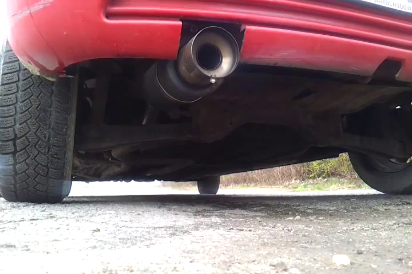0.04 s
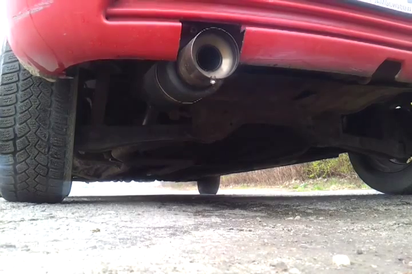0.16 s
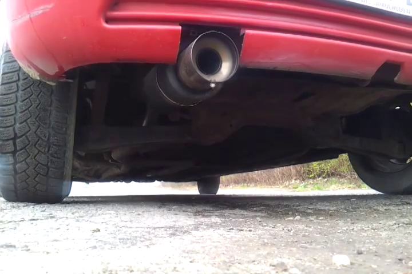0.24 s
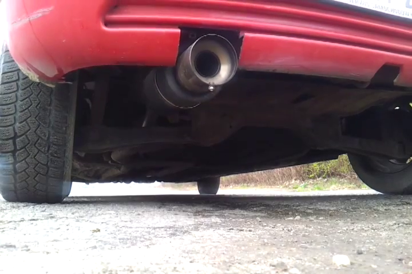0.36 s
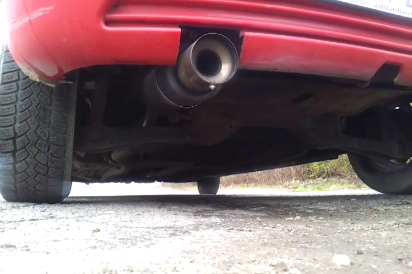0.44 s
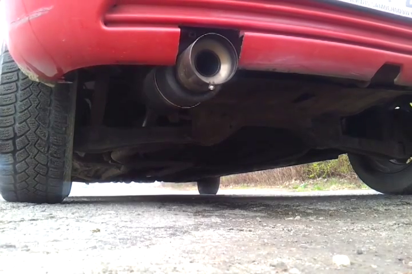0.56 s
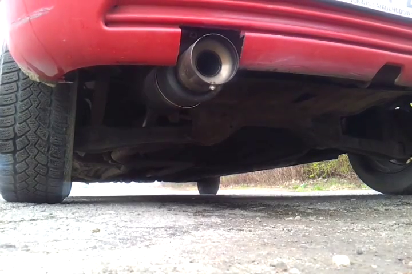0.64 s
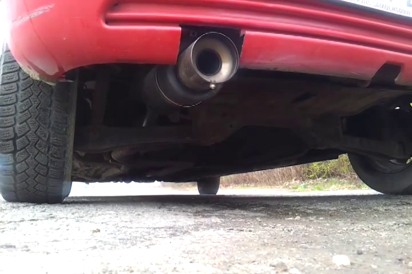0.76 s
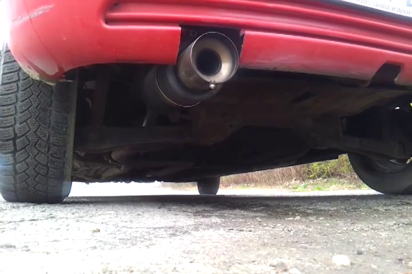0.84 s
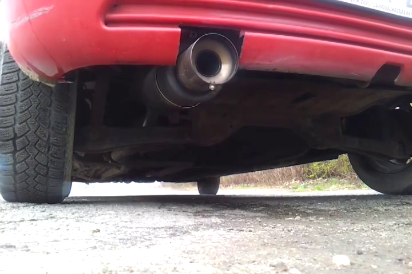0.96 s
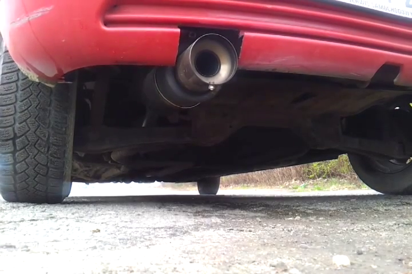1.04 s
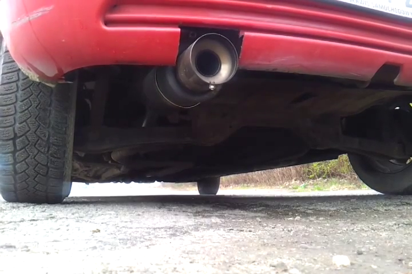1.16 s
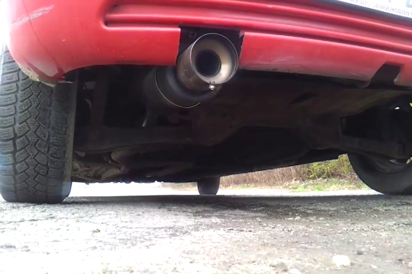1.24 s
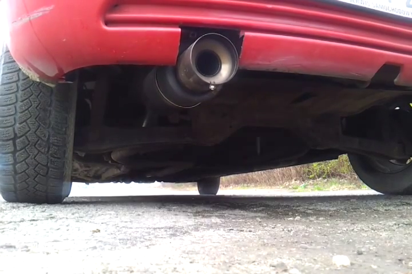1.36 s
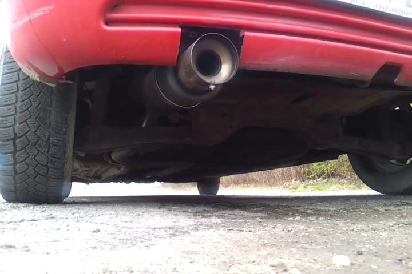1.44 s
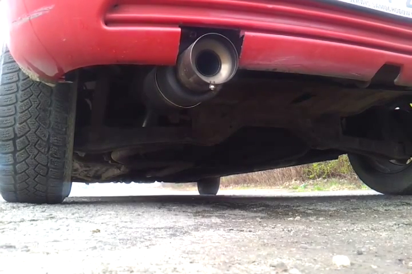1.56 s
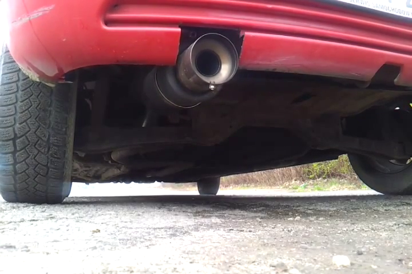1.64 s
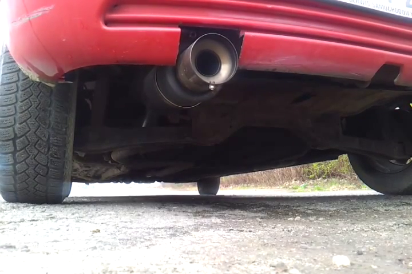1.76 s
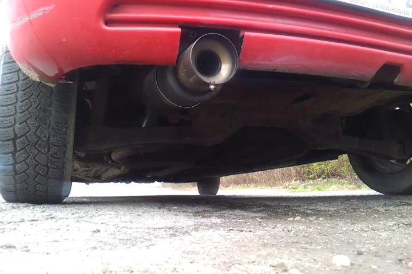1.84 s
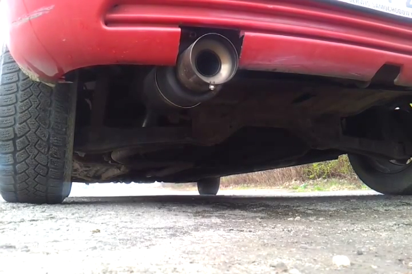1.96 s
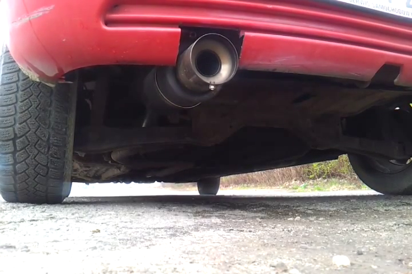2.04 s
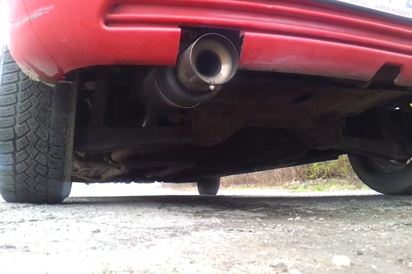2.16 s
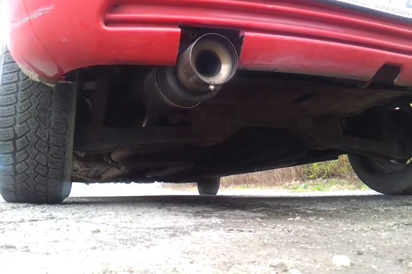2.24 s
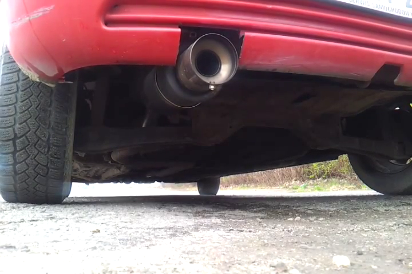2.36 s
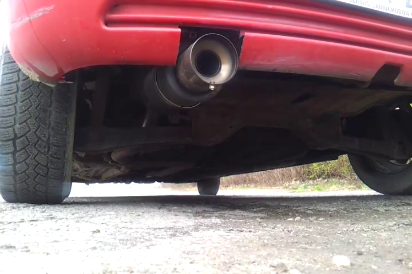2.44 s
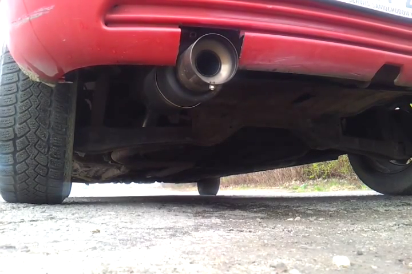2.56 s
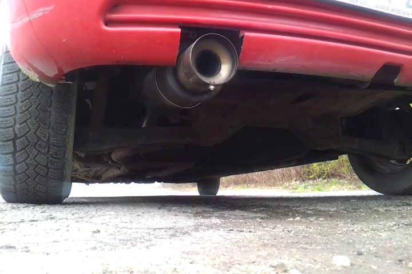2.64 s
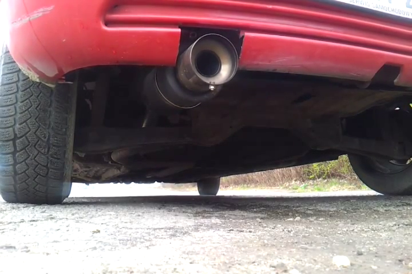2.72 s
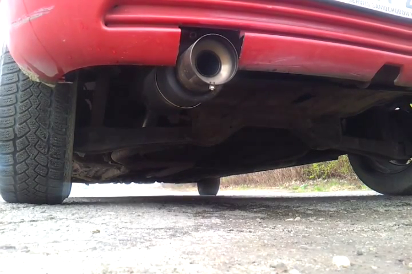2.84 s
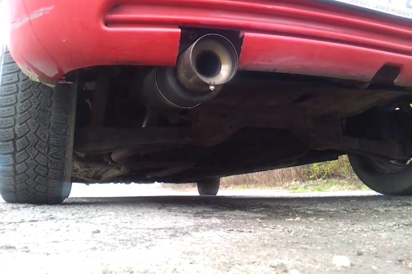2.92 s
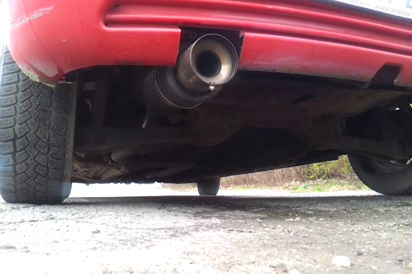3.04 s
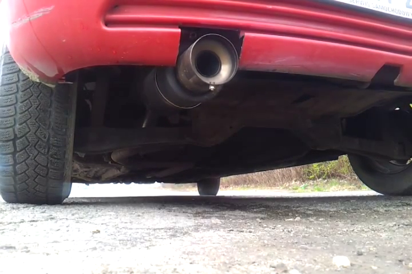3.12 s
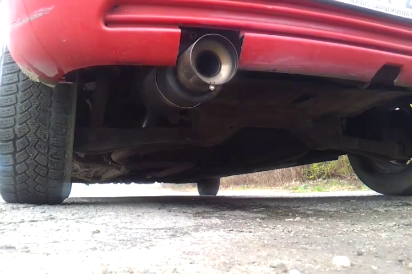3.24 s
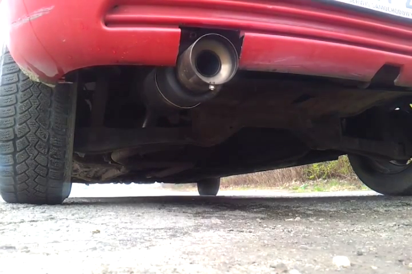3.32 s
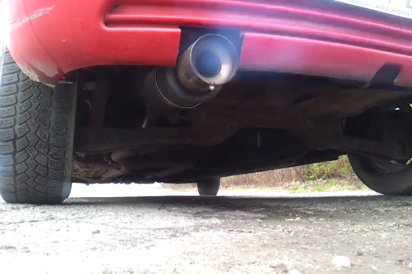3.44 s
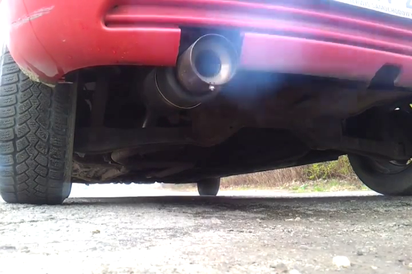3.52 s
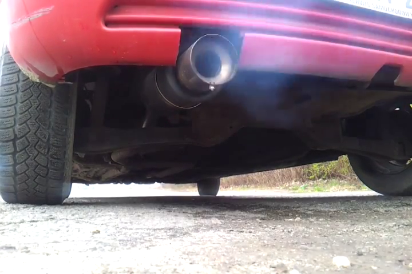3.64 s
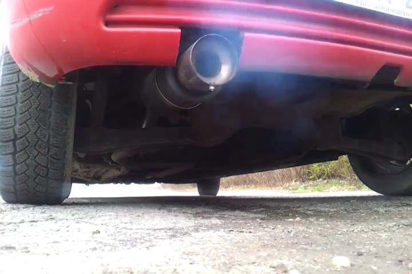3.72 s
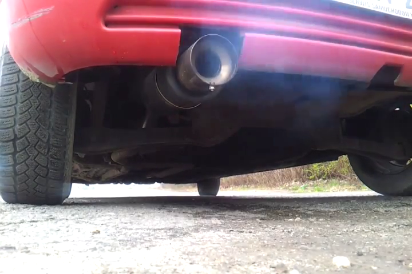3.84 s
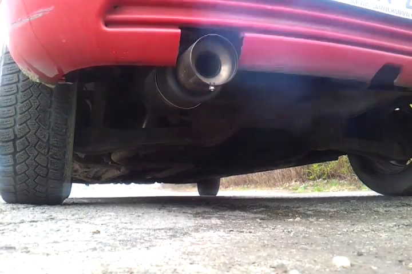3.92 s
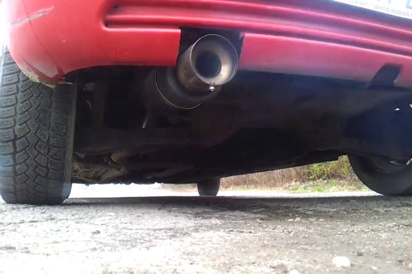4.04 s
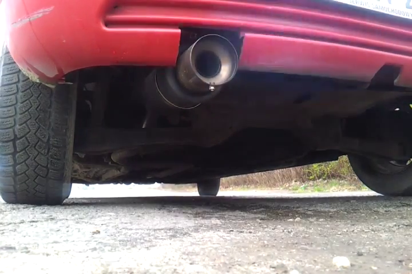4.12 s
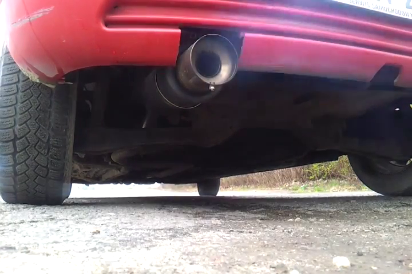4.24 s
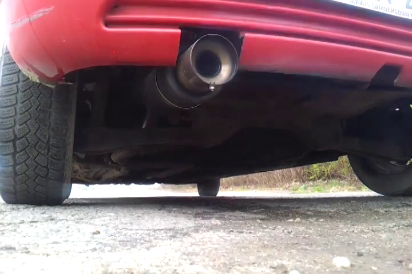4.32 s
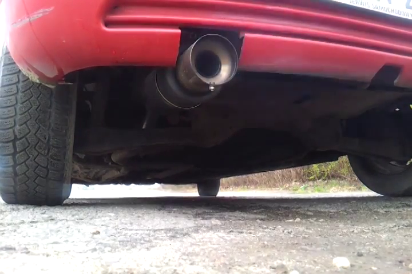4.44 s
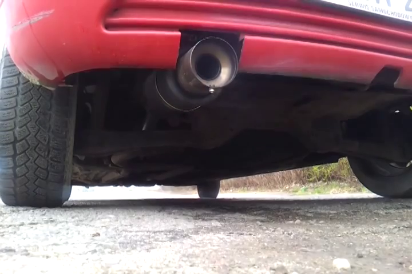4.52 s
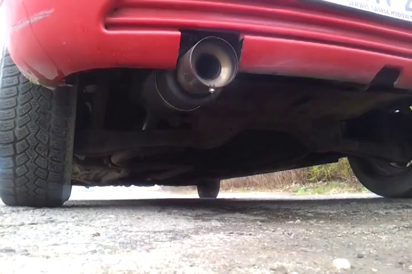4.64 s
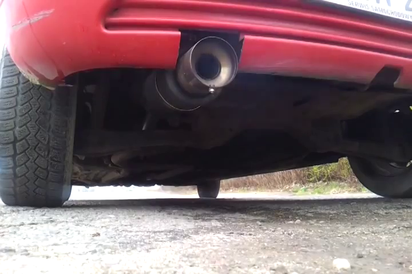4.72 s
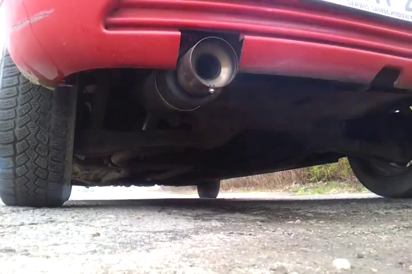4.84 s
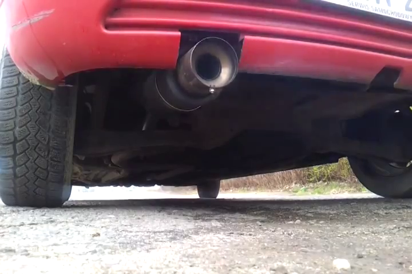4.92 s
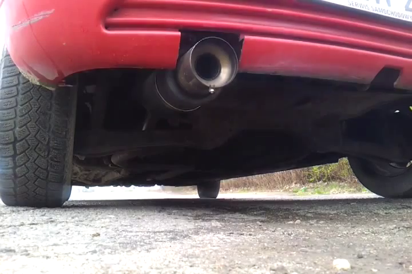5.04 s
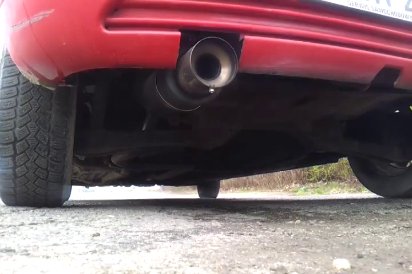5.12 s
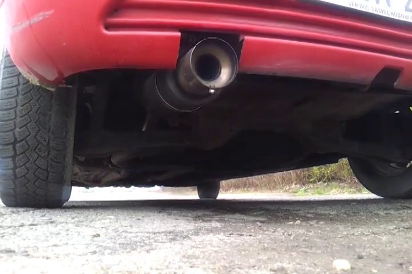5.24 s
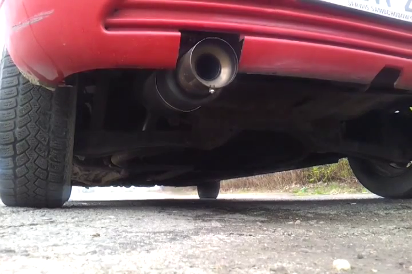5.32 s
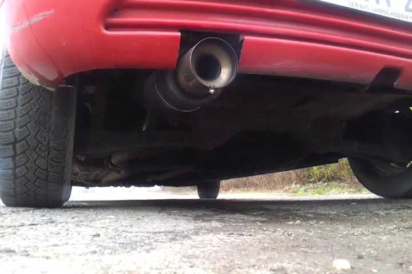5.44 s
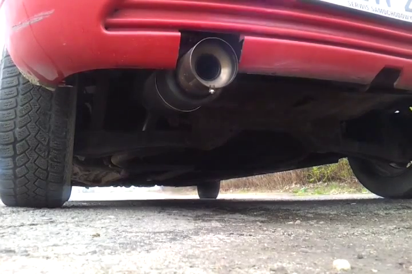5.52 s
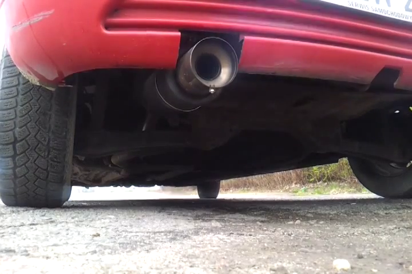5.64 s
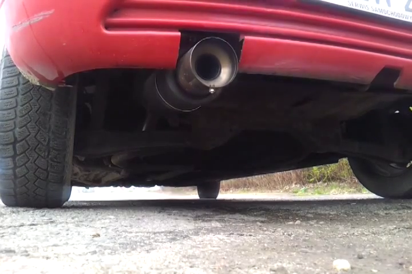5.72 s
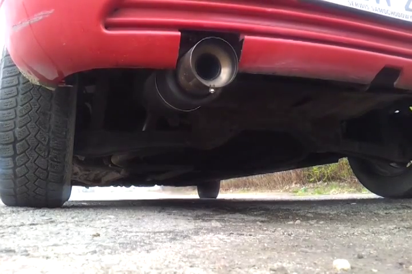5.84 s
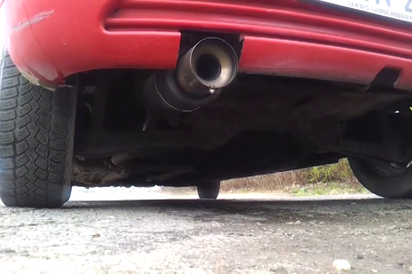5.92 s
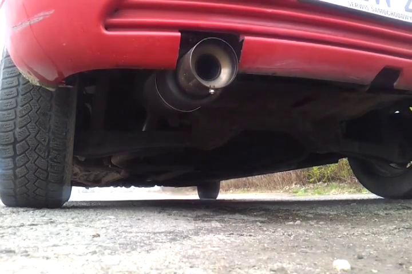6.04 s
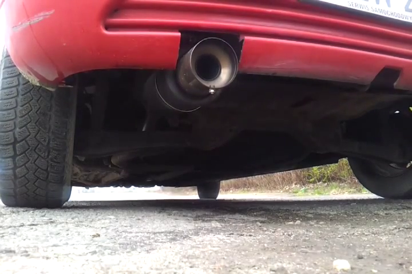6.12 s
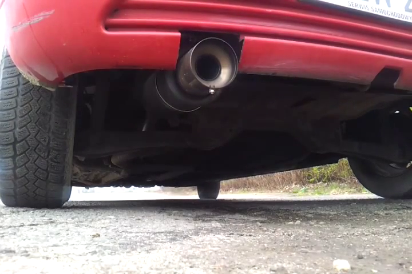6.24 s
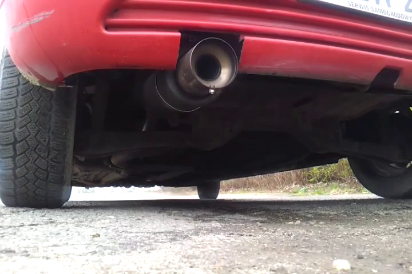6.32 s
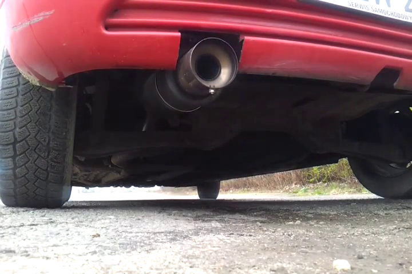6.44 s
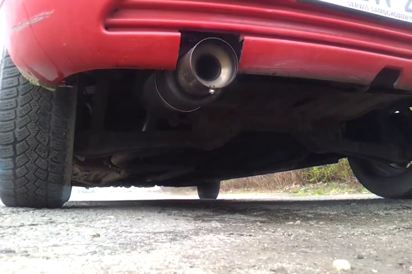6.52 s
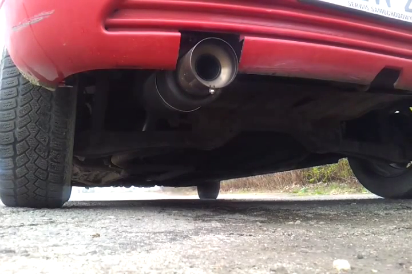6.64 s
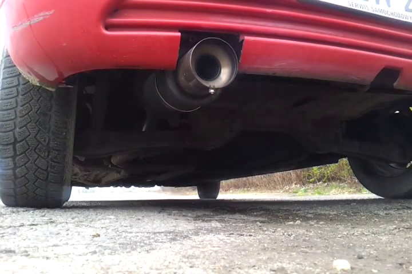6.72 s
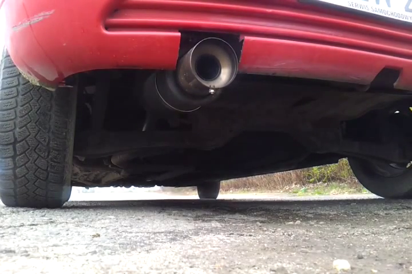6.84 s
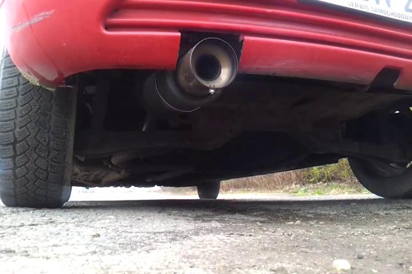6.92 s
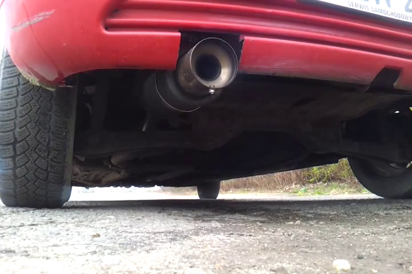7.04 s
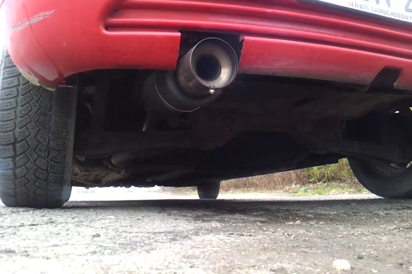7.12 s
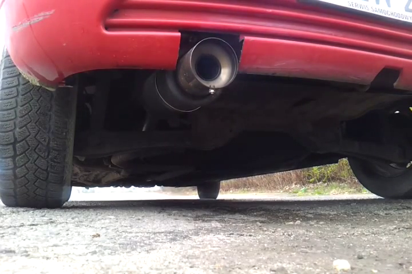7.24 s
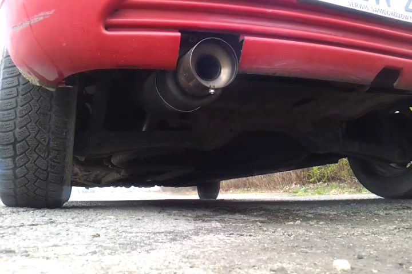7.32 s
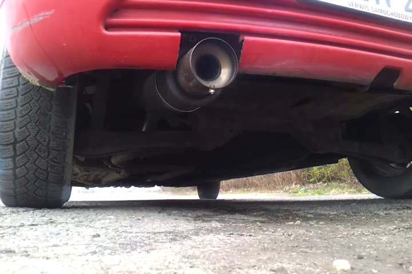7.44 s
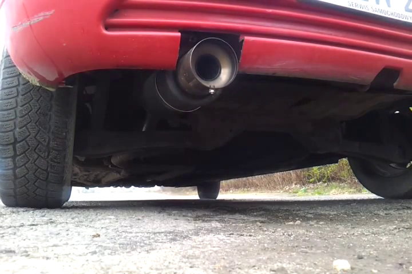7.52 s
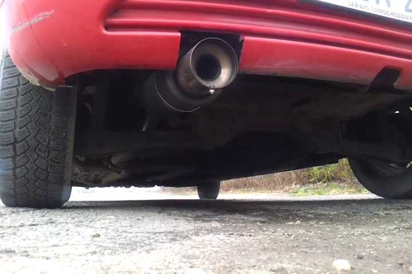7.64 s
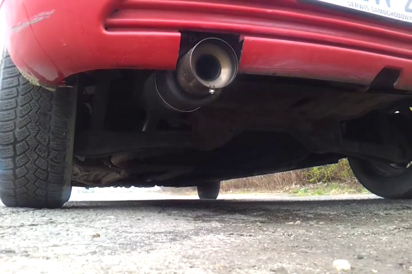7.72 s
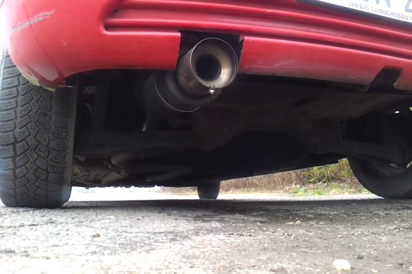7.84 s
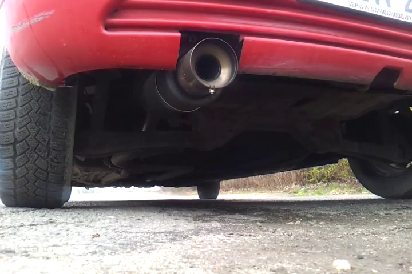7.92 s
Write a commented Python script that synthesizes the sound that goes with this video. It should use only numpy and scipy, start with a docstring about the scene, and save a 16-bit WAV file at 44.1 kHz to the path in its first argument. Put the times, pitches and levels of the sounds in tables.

```python
"""A small petrol engine idles on gravel, heard just behind the exhaust tip, then is blipped three times and eased up.
Each firing sends a pulse down the ringing pipe, built as a stack of orders, and a puff of hissing gas out of the tip.
Late charges pop in the pipe; rough noise bursts sound close to the microphone during the idle.
Behind lie outdoor air, a distant bird of gliding sines and a thin steady whine in the right port.
Two ports of one microphone listen, each with some turbulence of its own."""
import sys
import numpy as np
from scipy import signal
from scipy.fft import rfft, irfft, next_fast_len
from scipy.io import wavfile
from scipy.ndimage import uniform_filter1d

SR = 44100
rng = np.random.default_rng(int(sys.argv[2]) if len(sys.argv) > 2 else 0)


def digitize_waveform(pressure):
    """Quantize a signal to 16-bit integers and store it at the path in sys.argv[1].

    Rows of a 2-D input are taken as channels; values are limited to [-1, 1].
    """
    field = np.atleast_2d(pressure).T
    bounded = np.clip(field, -1, 1)
    quanta = np.round(bounded * 32767).astype(np.int16)
    wavfile.write(sys.argv[1], SR, quanta)


N = 351477
STEP = 64  # samples between control values


def gain_of(db):
    """dB to gain."""
    return 10 ** (np.asarray(db) / 20)


def evened(x):
    """Scales to rms 1."""
    return x / np.sqrt(np.mean(x ** 2) + 1e-20)


def steady(x, size=4000):
    """Divides out the slow level."""
    power = uniform_filter1d(uniform_filter1d(x ** 2, size), size)
    return x / np.sqrt(power + 1e-20)


def read(points, hz):
    """Reads a table on a log-frequency axis."""
    f, value = np.transpose(points)
    return np.interp(np.log(hz + 1), np.log(f + 1), value)


def causal(points):
    """Log response of a causal filter of the given spectrum: phase from the Hilbert transform of the log gain."""
    hz = abs(np.fft.fftfreq(8192, 1 / SR))
    log_gain = np.log(gain_of(np.maximum(read(points, hz), -100)))
    return np.conj(signal.hilbert(log_gain))


def impulse(points):
    """Impulse response of the causal filter of a spectrum."""
    return np.fft.ifft(np.exp(causal(points))).real[:4096]


def colour(x, points):
    """Filters each row by the causal response of a spectrum."""
    return signal.oaconvolve(x, impulse(points)[None], axes=1)[:, :N]


def below(x, order, hz):
    """Zero-phase low-pass."""
    return signal.filtfilt(*signal.butter(order, hz, fs=SR), x)


def above(x, order, hz):
    """One-way high-pass."""
    return signal.lfilter(*signal.butter(order, hz, "high", fs=SR), x)


def smooth(control):
    """Control values, one per STEP, to one per sample."""
    return np.interp(np.arange(N) / STEP, np.arange(len(control)), control)


def by_firing(turns, values):
    """Values given per firing, read at a running count of firings."""
    return np.interp(turns, np.arange(600), values)


# speed of the engine: (t/s, firings per s)
SPEED = [(0.0, 38.36), (1.318, 39.29), (2.702, 37.56), (3.15, 38.11), (3.278, 37.36), (3.456, 72.12),
         (3.58, 78.56), (3.873, 70.22), (4.169, 52.69), (4.275, 55.0), (4.452, 96.96), (4.535, 106.73),
         (4.83, 92.3), (5.351, 55.66), (5.537, 51.77), (5.617, 47.54), (5.813, 80.49), (5.948, 85.06),
         (6.264, 70.39), (6.493, 56.67), (6.872, 45.94), (6.961, 46.21), (7.045, 43.52), (7.289, 46.97),
         (7.621, 54.12), (7.97, 59.9)]
# the throttle, each row lasting until the next: (start t/s, takes over in/s, state, pulses level/dB,
# roar in the pipe at first level/dB, roar at last level/dB, hiss at the tip against the roar/dB)
THROTTLE = [(-.1, .05, "idle", -0.85, -37.5, -37.5, -8), (3.24, 0.064, "open", -3, -17.5, -21.5, -7.5),
            (3.468, 0.061, "coast", -1.5, -26.5, -28.5, -3.5), (3.92, 0.04, "catch", -0.5, -19, -28, -6.5),
            (4.16, 0.031, "shut", 3.5, -21, -36.5, -2.5), (4.215, 0.066, "open", -0.5, -11, -21.5, -8),
            (4.51, 0.022, "overrun", -1.5, -30.5, -28, -8.5),
            (4.715, 0.026, "sputter", -1.5, -28.5, -24.5, -8), (4.852, 0.11, "catch", -1.5, -16.5, -23, -7),
            (5.408, 0.043, "shut", -0.5, -35.5, -37, -5.5), (5.56, 0.14, "open", -1, -14, -20.5, -8),
            (5.82, 0.1, "drift", -2.5, -27, -27, -2), (6.28, 0.037, "catch", -1, -17, -25.5, -8.5),
            (6.55, 0.032, "shut", -0.5, -32, -40.5, -6.5), (6.74, 0.047, "shut", -5, -38, -39.5, -8.5),
            (6.955, 0.064, "light", -1.9, -31.5, -33, -9.5), (7.29, 0.14, "light", -1.5, -38, -27, -9.5)]
# how late in a state the roar moves to its last level: {state: power}
FADE_POWER = {"idle": 1, "open": 0.51, "coast": 1.4, "overrun": 1, "sputter": 1, "drift": 0.75, "catch":
              3.34, "shut": 0.74, "light": 0.53}
# the idle swells and sinks: (t/s, level/dB)
SWELL = [(0, 2.5), (.06, 0), (.55, -1.5), (.83, -0.5), (1.29, -2), (1.36, 1.5), (1.67, -3.5), (1.89, -4.5),
         (2.22, 2.5), (2.5, -4), (2.75, 3.5), (3.0, 2), (3.14, -3.5), (3.23, -1)]
SWELL_IN_GAS = 0.94  # share of the swell that the gas noise follows
FLYWHEEL_S = .06  # the flywheel rounds the corners of the speed


def controls():
    """Speed, share of each state, and levels of pulses, roar and hiss, each throttle row fading into the next."""
    t = np.arange(0, N + STEP, STEP) / SR
    width = round(FLYWHEEL_S * SR / STEP)
    rate = np.interp(t, *np.transpose(SPEED))
    for _ in range(2):
        rate = uniform_filter1d(rate, width, mode="nearest")
    begun = [np.clip((t - row[0]) / row[1], 0, 1) for row in THROTTLE] + [0 * t]
    ends = [row[0] for row in THROTTLE[1:]] + [N / SR]
    share, levels = {state: 0 * t for state in FADE_POWER}, 0
    for k, (start, _, state, pulse_db, first_db, last_db, hiss_db) in enumerate(THROTTLE):
        active = begun[k] - begun[k + 1]
        progress = np.clip((t - start) / (ends[k] - start), 0, 1) ** FADE_POWER[state]
        roar_db = first_db + (last_db - first_db) * progress
        share[state] = share[state] + active
        levels = levels + active * np.array([pulse_db + 0 * t, roar_db, roar_db + hiss_db])
    swell = share["idle"] * np.interp(t, *np.transpose(SWELL))
    return rate, share, levels + swell * np.array([[1], [SWELL_IN_GAS], [SWELL_IN_GAS]])


# how the pipe weighs a firing order at its frequency, one table a state: (f/Hz, rms level/dB)
IDLE_PIPE = [(38, -53), (77, -24), (115, -24.5), (154, -31), (192, -29), (232, -37.5), (270, -34.5),
             (310, -38), (348, -29.5), (387, -45.5), (425, -46), (540, -42.5), (620, -61.5), (900, -70)]
OPEN_PIPE = [(45, -31.5), (60, -30), (85, -21.5), (115, -16), (148, -17), (200, -16.5), (225, -15.5),
             (280, -23.5), (350, -17.5), (420, -24), (490, -24.5), (600, -41), (900, -39.5)]
COAST_PIPE = [(68, -20.5), (82, -17), (140, -31), (160, -14), (205, -23.5), (225, -15), (246, -15),
              (290, -31.5), (360, -31.5), (405, -38), (455, -18.5), (490, -34), (550, -37.5), (900, -46)]  # throttle shut, speed falling
OVERRUN_PIPE = [(85, -17), (105, -16), (185, -19), (207, -12), (280, -26), (308, -18), (370, -29),
                (405, -25.5), (470, -23.5), (515, -43.5), (600, -39), (900, -49)]  # throttle shut at the highest speed
DRIFT_PIPE = [(68, -20.5), (82, -13), (145, -22), (165, -20), (215, -22), (242, -36), (320, -40),
              (405, -28), (480, -28), (560, -37.5), (900, -41.5)]  # throttle shut after the third blip, with weaker orders around 240-320 Hz
CATCH_PIPE = [(53, -32), (62, -24.5), (85, -13), (108, -21), (119, -15.5), (142, -35), (165, -16.5),
              (181, -38), (195, -23), (215, -29.5), (240, -21), (258, -21), (280, -26), (325, -23),
              (370, -30), (400, -41), (440, -26), (520, -35), (900, -46.5)]  # firing takes hold again while the speed still falls
SHUT_PIPE = [(45, -42), (53, -34), (100, -29), (150, -29), (205, -23), (250, -36), (300, -45.5),
             (350, -35.5), (410, -43.5), (470, -39), (520, -47.5), (900, -59)]  # firing drops out again and the pipe hums on
LIGHT_PIPE = [(44, -49), (60, -25), (88, -20), (120, -19.5), (135, -21), (175, -14.5), (215, -13.5),
              (240, -34.5), (260, -29), (278, -24), (330, -40), (360, -23), (410, -40.5), (460, -26),
              (510, -36.5), (650, -46), (900, -51.5)]
PIPE_OF = {"idle": IDLE_PIPE, "open": OPEN_PIPE, "coast": COAST_PIPE, "overrun": OVERRUN_PIPE,
           "sputter": OVERRUN_PIPE, "drift": DRIFT_PIPE, "catch": CATCH_PIPE, "shut": SHUT_PIPE,
           "light": LIGHT_PIPE}
ECHO_S = .0036  # inverted echo from the open end
RING_HZ, RING_WIDTH_HZ = 349.4, 5.2  # ring of the silencer
WANDER_DB, WANDER_RAD = 3, 0.42  # scale of each order's own wander from firing to firing


def firing_pulses(slow_rate, share, pulse_db, turns, turn, loose, loud):
    """Firing pulses as a stack of 16 orders, each weighed and delayed as the pipe does it."""
    idle = share["idle"]
    lags = {state: causal(pipe).imag[:400] for state, pipe in PIPE_OF.items() if state != "idle"}
    lags["catch"] = .4 * lags["open"]  # a catching charge makes a narrow spike that rings less
    wander = uniform_filter1d(rng.standard_normal((600, 17, 2)), size=3, axis=0) * np.sqrt(3)

    def order(k):
        """One order: idle starts with suction and its echo, under load the pipe rings on."""
        hz = k * slow_rate
        echo = 1 - .9 * np.exp(-2j * np.pi * hz * ECHO_S)
        ring = 1 + 13.0 / (1 + 2j * (hz - RING_HZ) / RING_WIDTH_HZ)
        phasor = -idle * echo * ring / abs(echo * ring)
        for state, lag in lags.items():
            phasor = phasor + share[state] * np.exp(1j * np.interp(hz * 8192 / SR, np.arange(400), lag))
        level_db = pulse_db + sum(part * read(PIPE_OF[state], hz) for state, part in share.items())
        # upper orders wander most; at idle only the tenth and above
        freedom = (1 - idle * (k < 10))[:-1] * loose[::STEP] * min(k / 5, 1) ** 2
        free_level, free_phase = [freedom * by_firing(turns[::STEP], v) for v in wander[:, k].T]
        gain = smooth(gain_of(level_db)) * smooth(gain_of(WANDER_DB * free_level))
        pipe_phase = smooth(np.unwrap(np.angle(phasor)))
        return gain * np.cos(k * turn + pipe_phase + smooth(WANDER_RAD * free_phase))

    low, high = sum(map(order, range(1, 5))), sum(map(order, range(5, 17)))
    high *= 1.15 - 0.17 * loud  # upper orders are a little weaker when the roar is loud
    return np.sqrt(2) * (low + high)


# colour of the gas noise in the pipe: (f/Hz, relative level/dB per Hz)
ROAR = [(60, -34.5), (150, -1.5), (270, 0.5), (430, 3), (600, -6.5), (800, -7), (1150, -6.5), (1500, -12),
        (1800, -14), (2150, -15), (2700, -24), (3300, -55), (4500, -45.5)]
# colour of the gas noise at the tip: (f/Hz, relative level/dB per Hz)
HISS = [(1800, -45.5), (2700, -10), (3200, -15.5), (3700, -14.5), (4120, -10), (4600, -12), (5120, -11),
        (5700, -16), (6400, -10), (6900, -4), (7600, -6), (11200, -24), (12000, -22), (14000, -8),
        (15000, -43)]
# the tip rings while firing catches: (f/Hz, gain/dB)
RASP = [(1500, -2), (2050, -1), (2600, -1), (3200, -6), (3700, -3), (4050, 0.5), (4650, -8.5), (5200, 3.5),
        (5680, -7), (6300, -1), (7050, 1.5), (8000, -2.5)]


def exhaust_gas(rate, roar_db, hiss_db, late, size, loud, catch, depth, cracking, low_db):
    """Gas noise that puffs with every firing: roar from the pipe, hiss from the tip."""
    sharp = 3 - 1.2 * np.clip((rate - 60) / 40, 0, 1)
    sharp = sharp * (1 - 0.58 * catch)  # catching fire breathes in longer puffs
    puff = 0.67 + depth * size * np.exp(sharp * (np.cos(2 * np.pi * late) - 1))
    # eddies make the flow gritty
    grit = gain_of(1.6 * evened(uniform_filter1d(rng.standard_normal(N), 60)))
    gas = rng.standard_normal((2, 3, N)) * puff * grit
    # a strong pulse front steepens into a crack
    crack = np.diff((late + 0.045).astype(int), prepend=0) * size * loud * cracking

    roar = steady(colour(gas[0] + 8.0 * crack, ROAR))
    # the roar's level counts above 700 Hz
    roar *= gain_of(roar_db) * evened(roar).std() / above(roar, 4, 700).std()
    rumble = below(roar, 2, 550)
    edge = signal.filtfilt(*signal.butter(2, 1300, "high", fs=SR), roar)
    edge_db = 0.67 * (hiss_db - roar_db + 6)  # the roar's edge follows the hiss
    roar += (gain_of(low_db) - 1) * rumble + (gain_of(edge_db) - 1) * edge

    hiss = gain_of(hiss_db) * steady(colour(gas[1] + 0.98 * crack, HISS))
    dull = below(hiss, 4, 10500)
    # the highest treble fades in as the hiss grows louder
    fine = np.minimum(gain_of(1.45 * (hiss_db + 24.0)), 1)
    flow = roar + fine * hiss + (1 - fine) * dull
    return flow + catch * (colour(flow, RASP) - flow)


SNAP_HZ, SNAP_T60_S, SNAP_DB, SNAP_LAG = 1130, 0.0075, -13.5, 0.246  # lag in firings


def overrun_snaps(late, size, overrun):
    """On the overrun each pulse front snaps: a short decaying sine, first swing inward."""
    ring_s = np.arange(800) / SR
    fronts = np.diff(np.floor(late - SNAP_LAG), prepend=0)
    snaps = fronts * gain_of(SNAP_DB) * size * overrun
    ring = gain_of(-60 * ring_s / SNAP_T60_S) * np.sin(2 * np.pi * SNAP_HZ * ring_s)
    return -signal.oaconvolve(snaps, ring)[:N]


# strength of each cylinder in firing order: (level/dB)
CYLINDERS_DB = [0.23, 0.046, 0.029, 0.17]
# how gas leaves the tip: {state: (depth of the puffs, unevenness from firing to firing/dB, crack strength,
# pipe noise below the roar's knee/dB, wander of the orders, extra lag of the pulse/firings)}
FLOW = {"idle": (0.59, 2, 1.3, 0, 1.2, 0.045), "open": (2.0, 3, 0, -3.5, 0.47, 0.5),
        "coast": (.5, 3.5, -0.5, -1.5, 1.36, 0.2), "overrun": (1.2, 3, 0.2, 6, .5, 1.2),
        "sputter": (1.1, -3.5, -0.8, 2.5, 1.5, 0.46), "drift": (0.6, 1.5, -0.5, 0, 1.6, 0.34),
        "catch": (2, 3.5, .3, -7.5, 0.2, -0.04), "shut": (0.39, 3, 1.5, -3.8, 1.5, -0.067),
        "light": (0.25, 3, -1.5, -1.5, 0.5, 0)}
# single firings that stand out: (t/s, extra level/dB)
HARD_FIRINGS = [(3.287, 2.5), (3.31, 6), (3.335, 7), (3.39, 5), (3.465, -2.5), (3.957, 3), (4.084, 2.5),
                (4.25, 12), (4.266, 4.5), (4.286, -1.5), (4.301, 1.5), (4.319, 3), (4.77, 4.5), (4.95, 2),
                (5.424, 1.5), (5.576, 6), (5.601, 11), (5.634, 6), (5.67, 4), (5.894, 0.5), (6.304, 6)]
HARD_S = 0.0044  # half length of such a firing
LOAD_LAG = 0.2466  # share of a firing by which pulses come later under load
LAG_SETTLES_S = .16  # the lag of the pulse changes gradually


def engine():
    """One count of firings drives pulses, gas and snaps; rows: shared, left's own, right's own."""
    slow_rate, share, (pulse_db, *gas_db) = controls()
    rate, roar_db, hiss_db = map(smooth, (slow_rate, *gas_db))
    loud = np.clip((roar_db + 38.5) / 18, 0, 1)  # loudness of the roar, 0-1
    load = 1 - smooth(share["idle"])  # 0 at idle, 1 once the throttle opens
    turns = np.cumsum(rate) / SR + .657 - LOAD_LAG * load
    flow_settings = sum(np.outer(FLOW[state], part) for state, part in share.items())
    depth, uneven_db, cracking, low_db, loose, pulse_lag = map(smooth, flow_settings)
    pulse_lag = uniform_filter1d(pulse_lag, round(LAG_SETTLES_S * SR))

    luck = rng.standard_normal((600, 3))
    cylinder_db = by_firing(turns, np.take(CYLINDERS_DB, np.arange(600) % 4))
    strength = gain_of(cylinder_db + (1.15 + 0.25 * loud) * by_firing(turns, luck[:, 0]))
    size = strength * gain_of(uneven_db * by_firing(turns, luck[:, 1]))
    # pulse and puff are timed apart, a little unevenly
    jitter = 0.011 * by_firing(turns, luck[:, 2])
    turn = 2 * np.pi * (turns - pulse_lag + 0.061 + 0.069 * load + jitter)
    late = turns - 0.095 * (1 - load)

    pulses = strength * firing_pulses(slow_rate, share, pulse_db, turns, turn, loose, loud)
    flow = exhaust_gas(rate, roar_db, hiss_db, late, size, loud, smooth(share["catch"]),
                       depth, cracking, low_db)
    flow += overrun_snaps(late, size, smooth(share["overrun"]))
    t = np.arange(len(slow_rate)) * STEP / SR
    hard_db = sum(db * np.exp(-((t - s) / HARD_S) ** 2) for s, db in HARD_FIRINGS)
    return smooth(gain_of(hard_db)) * (pulses + flow)


# colour of the outdoor air: (f/Hz, relative level/dB per Hz)
AIR = [(200, -22), (400, 16.5), (800, -0.5), (1500, -23.5), (3000, -12.5), (3450, -6.5), (3900, -12),
       (4500, -7.5), (5000, -16.5), (5600, -14), (7400, -35), (10000, -22.5), (11500, -46), (15000, -59)]
AIR_DB = -34.5  # rms ahead of the ports


def outdoor_air():
    """Steady coloured noise of the open air around the microphone."""
    return gain_of(AIR_DB) * evened(colour(rng.standard_normal((3, N)), AIR))


def whine():
    """A thin steady sine in the right port only."""
    tone = gain_of(-68.5) * np.sin(2 * np.pi * 12404 * np.arange(N) / SR)
    return tone * np.array([[0], [2]])


# faint gliding chirps of a distant bird: (t/s, length/s, first f/Hz, last f/Hz, peak level/dB ahead of the ports)
CHIRPS = [(.775, .03, 3550, 3250, -50), (.89, .04, 6300, 5900, -48), (0.973, 0.042, 3780, 3050, -41.5),
          (1.268, 0.032, 6700, 6050, -40), (1.298, 0.035, 6100, 5200, -49), (1.80, .03, 6300, 6900, -45),
          (1.903, 0.045, 6700, 5850, -48)]


def bird():
    """Each chirp is a gliding sine under a smooth swell."""
    out = np.zeros(N)
    for s, length, first_hz, last_hz, db in CHIRPS:
        n = round(length * SR)
        glide = np.cumsum(np.linspace(first_hz, last_hz, n)) / SR
        out[round(s * SR):][:n] += gain_of(db) * np.sin(2 * np.pi * glide) * np.hanning(n)
    return out


# short rough bursts close to the microphone during the idle:
# (t/s, level/dB before the rise and fall, length/s, centre f/Hz, width/Hz, fizz gain/dB)
BURSTS = [(1.406, -17.5, 0.022, 554, 800, -34), (1.425, -8.5, 0.026, 240, 246, -59),
          (1.429, -10, 0.018, 870, 660, -27), (1.449, -15, 0.025, 700, 710, -37),
          (1.507, -17, 0.032, 555.6, 972, -24)]


def bursts():
    """Noise twice through one broad resonance, with some fizz, under a quick rise and fall."""
    out, t = np.zeros((3, N)), np.arange(4000) / SR
    for s, db, length, hz, width_hz, fizz_db in BURSTS:
        r = np.exp(-np.pi * width_hz / SR)
        poles = [1, -2 * r * np.cos(2 * np.pi * hz / SR), r * r]
        noise, fizz = rng.standard_normal((2, 3, 4000))
        ring = signal.lfilter([1, -1], np.convolve(poles, poles), noise)
        fizz = signal.lfilter(*signal.butter(2, 7000, fs=SR), fizz)  # fizz reaches up to 7 kHz
        shape = np.clip(t / (0.21 * length), 0, 1) * np.exp(-(t / length) ** 2)
        burst = gain_of(db) * evened(ring) + gain_of(fizz_db) * fizz
        out[:, round(s * SR):][:, :4000] += burst * shape
    return out


# late charges that pop in the pipe around firing taking hold again: (t/s, peak level/dB ahead of the ports)
POPS = [(3.934, -7.5), (4.184, -14), (4.213, -13), (4.248, -5), (4.727, -11), (4.756, -14), (4.784, -10),
        (4.808, -10), (4.828, -6), (4.837, -7), (4.850, -7), (4.873, -4.5), (4.885, -2), (4.900, -4),
        (4.909, -6), (4.943, -5), (6.156, -17), (6.184, -16), (6.211, -11), (6.240, -4), (6.28, -6)]
# how the pipe colours a pop: (f/Hz, relative level/dB per Hz)
POP_PIPE = [(40, -17), (110, -7), (180, 6), (250, -2.5), (330, -7.5), (450, -12), (600, -20), (1200, -33),
            (2500, -61.5)]


def pops():
    """Each pop is one pulse that rings through the pipe."""
    taps = impulse(POP_PIPE)
    out = np.zeros(N)
    for s, db in POPS:
        out[round(s * SR) - taps.argmax():][:4096] += gain_of(db) * taps / taps.max()
    return out


# likeness of the two ports: (f/Hz, shared part of the power 0-1)
SAME = [(60, 1), (300, 0.97), (500, 0.96), (1000, 0.9), (2000, 0.97), (4000, 0.66), (8000, 0.29),
        (12000, .2)]
# phase by which the left port leads: (f/Hz, lead/rad)
LEAD = [(0, -0.1), (600, -0.53), (1290, -1.24), (2760, -1.98), (4130, -1.73), (6890, -2), (15000, -1.6)]
# tilt between the ports: (f/Hz, left minus right level/dB)
LEAN = [(60, 5), (110, 3.5), (200, 2.5), (380, 0), (690, 1.5), (1280, -1.5), (2360, -2), (4360, 1),
        (6000, -9), (8040, -13.5), (14800, -24.5)]


def ports(x):
    """Two ports hear the shared sound with a lag and a tilt, plus a share of turbulence of their own."""
    size = next_fast_len(N + SR)
    hz = np.fft.rfftfreq(size, 1 / SR)
    same = np.clip(read(SAME, hz), 0, 1)
    shared, *own = rfft(x, size)
    side = np.exp(.5j * read(LEAD, hz)) * gain_of(read(LEAN, hz) / 2)
    pair = np.array([side, 1 / side]) / abs(side + 1 / side) * 2
    heard = np.sqrt(same) * shared + np.sqrt(1 - same) * np.array(own)
    return irfft(heard * pair, size)[:, :N]


def scene():
    """Engine, air, bird, bursts and pops reach the ports; the whine sits in the right one."""
    # one-row sources add to all three rows, shared and own
    return ports(engine() + outdoor_air() + bird() + bursts() + pops()) + whine()


def record(dry):
    """The microphone loses the deepest bass; peaks beyond full scale clip; then the band limit."""
    bass_loss = signal.butter(2, 40.3, "high", fs=SR, output="sos")
    cut = np.clip(signal.sosfilt(bass_loss, dry), -1, 1)
    band_limit = signal.firwin(511, 15100, window=("kaiser", 9), fs=SR)
    return signal.oaconvolve(cut, band_limit[None], "same")


dry = scene()
out = record(dry)
digitize_waveform(out)
```